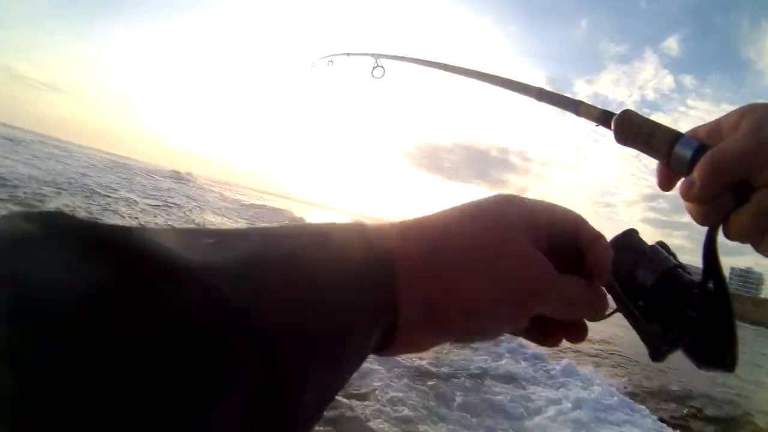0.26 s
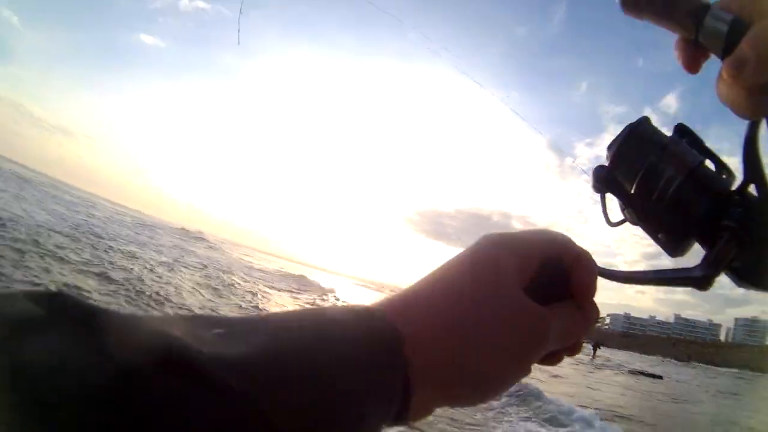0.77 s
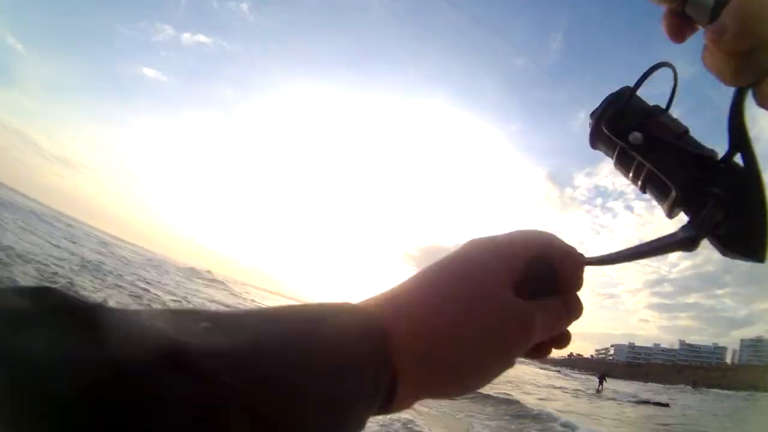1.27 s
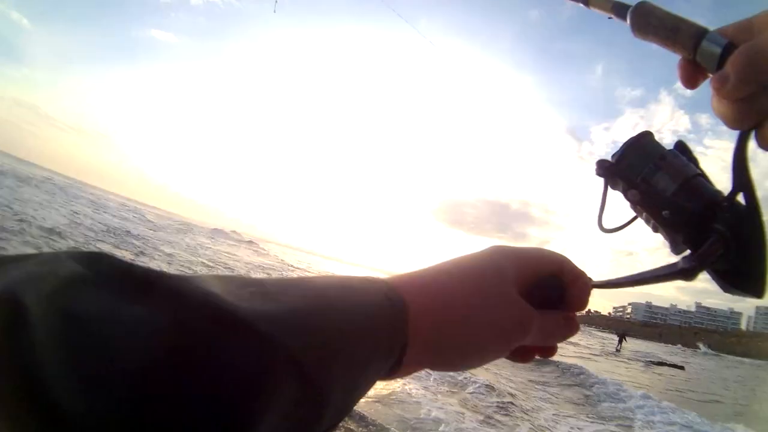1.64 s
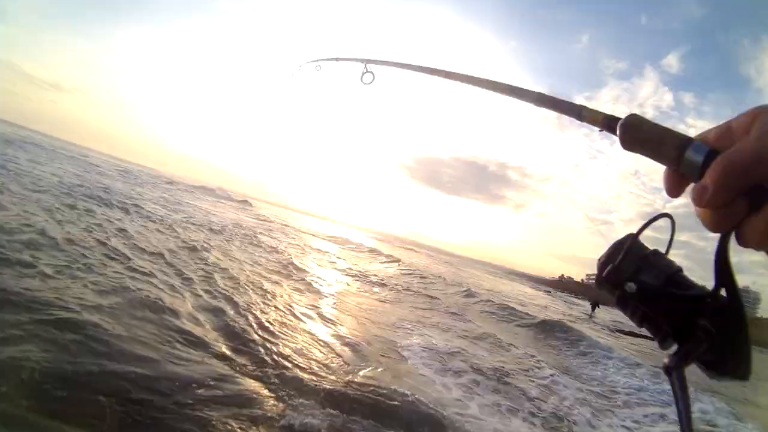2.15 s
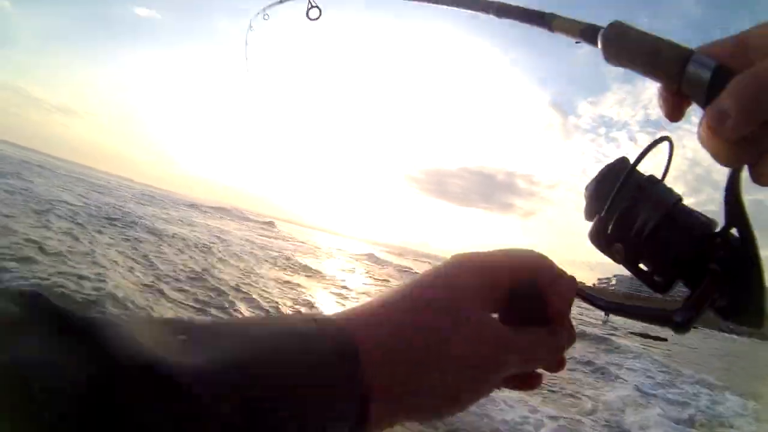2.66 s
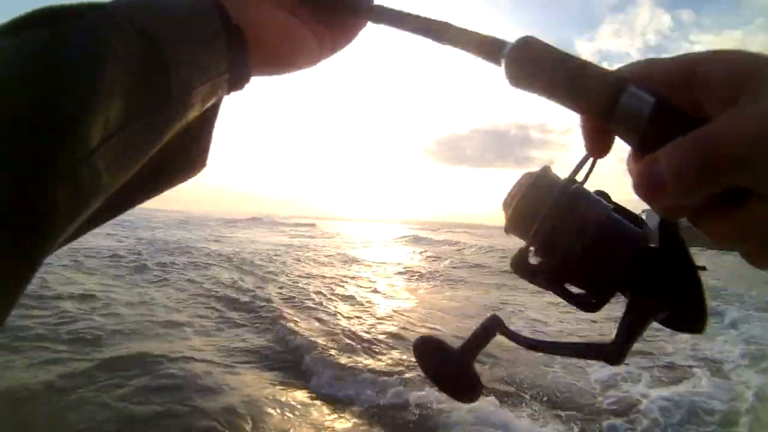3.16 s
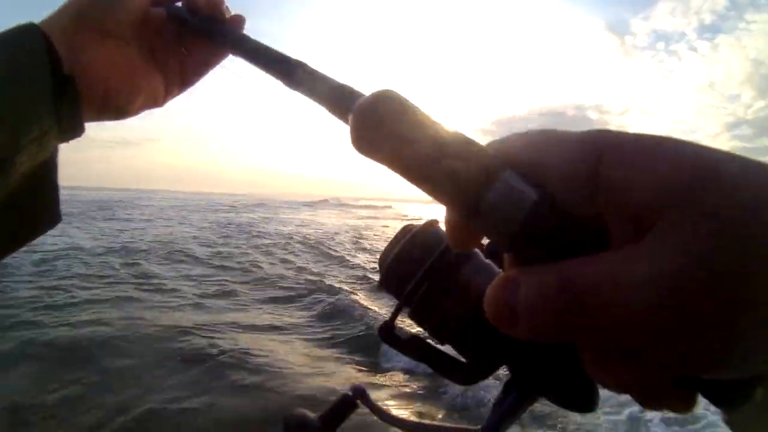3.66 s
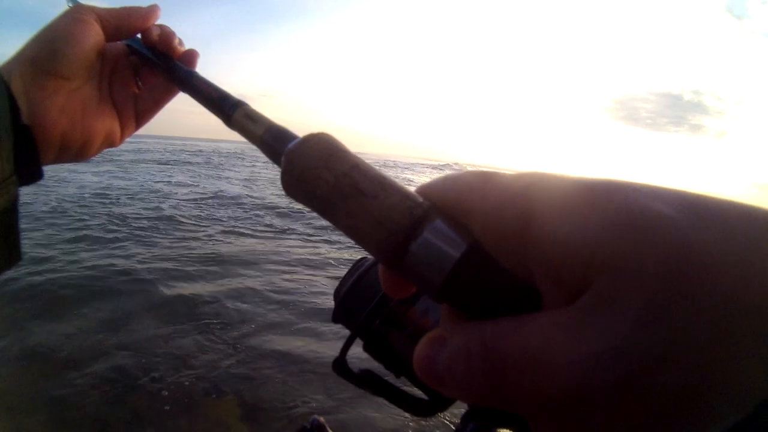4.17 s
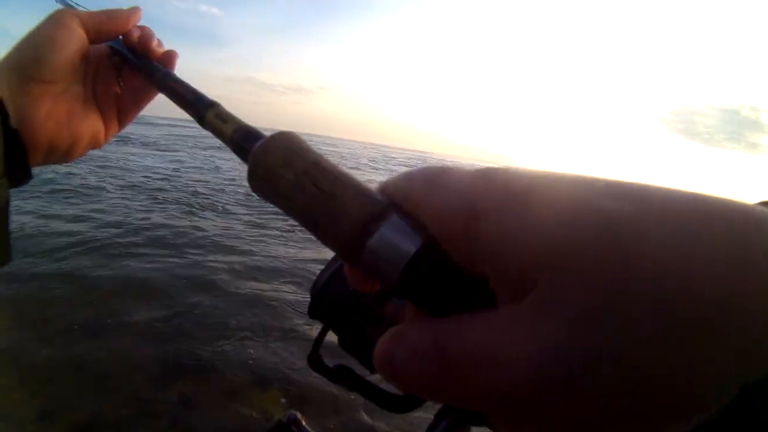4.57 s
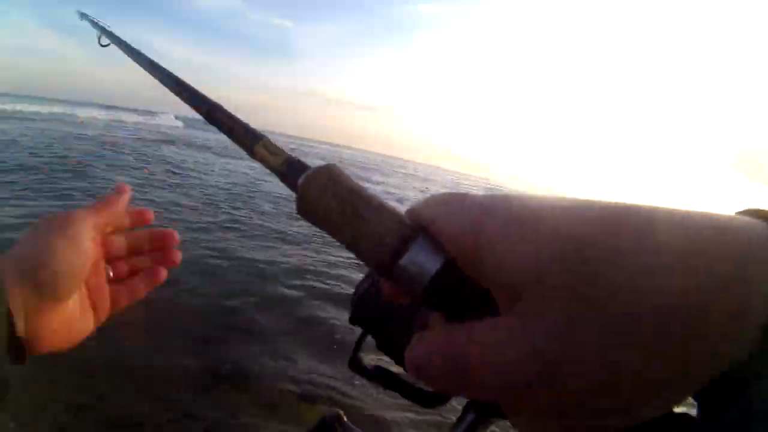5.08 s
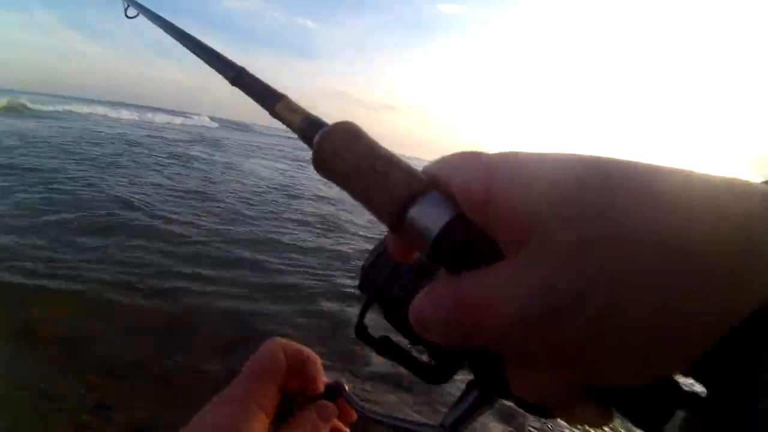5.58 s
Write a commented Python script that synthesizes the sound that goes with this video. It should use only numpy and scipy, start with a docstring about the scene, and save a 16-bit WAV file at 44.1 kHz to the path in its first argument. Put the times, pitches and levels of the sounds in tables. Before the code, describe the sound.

Surf roars and washes over shore rocks for about six seconds, strongest at the start and surging again near 1.4, 3.9 and 4.6 seconds, with fizzing foam. Water slaps and gurgles in nearby hollows, most clearly in the first 0.7 seconds, around 3.4 and at 4.4 seconds. Light wind flutters on the microphone with soft low thumps, easing between about 4 and 5 seconds. An angler's sleeve rustles at the start, from 1.1 to 1.7, from 2.6 to 3.6 and again after 4.9 seconds. A fishing rod and reel tick irregularly throughout, with clearer clicks near 1.7, 3.3 and 4.6 seconds. At 3.5 seconds one short, sharp knock strikes the microphone's case, by far the loudest sound. The body-worn microphone's hard case gives everything a boxy tone, and a faint hiss and thin high whine run underneath.

```python
"""Angler on shore rocks

Surf roars, splashes, foams and slaps into hollows, heard from a body-worn camera in a hard case.
Air buffets the case, a sleeve rustles, rod and reel tick; one sharp knock rings the case.
The case colours water, cloth and ticks. Electronics hiss and whine; the gain ducks at the knock."""
import sys
import numpy as np
from scipy import signal
from scipy.fft import rfft, irfft, next_fast_len
from scipy.io import wavfile
from scipy.ndimage import uniform_filter1d, minimum_filter1d, map_coordinates

SR = 44100
rng = np.random.default_rng(int(sys.argv[2]) if len(sys.argv) > 2 else 0)


def dump_mix(stems):
    """Bounce the given channels to the path in sys.argv[1] as a 16-bit WAV at rate SR."""
    frames = np.atleast_2d(stems).T  # one column per channel
    limited = np.clip(frames, -1, 1)  # hard clip at full scale
    pcm = np.round(limited * 32767).astype(np.int16)
    wavfile.write(sys.argv[1], SR, pcm)


N = 257544

# Resonances and dips of the case wall. Each row: centre in Hz, width in Hz, gain in dB.
CASE_BANDS = [(1000, 356, 8.5), (1053, 49, 3.5), (1293, 158, 7), (1484, 200, 2.5), (1781, 333, 8),
              (2905, 230, 2.5), (3420, 130, -4), (3902, 690, 14), (5140, 250, -4.5), (5750, 2340, 10),
              (7100, 980, 5.5), (7600, 390, -5)]
# Waves running onto the rocks. Each row: crest time in seconds, wash level in dB, foam level in dB.
WAVE_CRESTS = [(.04, -40.5, -51), (.5, -44.5, -55.5), (.75, -48, -69), (1.42, -46, -58.5),
               (2.66, -49.5, -63), (3.02, -50.5, -64), (3.36, -48, -56.5), (3.85, -45, -60),
               (4.35, -50, -58), (4.6, -47.5, -64), (5.6, -47, -76)]
# Water and cloth spectra before the case. Each row: frequency in Hz, relative density in dB.
ROAR_SPECTRUM = [(20, -36), (70, -7.5), (150, -4.5), (300, -1.5), (420, -2), (550, -6), (750, -8),
                 (1100, -16), (2000, -21), (6000, -40.5)]
WASH_SPECTRUM = [(150, -43), (500, -0.5), (800, 0), (1200, -1), (1600, -5.5), (2100, -6.5), (2800, -13),
                 (4500, -36), (12000, -63)]
FOAM_SPECTRUM = [(600, -5), (1600, -8.5), (2400, 9), (3200, -3.5), (4600, -10.5), (6500, -11.5), (9000, -6),
                 (12000, -15), (16000, -34)]
CLOTH_SPECTRUM = [(500, -34), (1100, -4), (1500, -0.5), (1850, 3.5), (2050, 3.5), (2400, -6), (4000, -20),
                  (7000, -26), (12000, -48)]
GURGLE_SPECTRUM = [(300, -36), (700, -3), (1000, 4), (1300, -5), (1900, -31), (3000, -46), (8000, -34)]
# Air, preamplifier and knock contact spectra. Each row: frequency in Hz, relative density in dB.
FLUTTER_SPECTRUM = [(8, -5), (20, 3.5), (35, 1), (60, -11), (100, -10), (200, -14.5), (350, -25.5),
                    (700, -41)]
THUMP_SPECTRUM = [(8, -12), (20, 7), (40, 1), (65, -8), (100, -17.5), (200, -19.5), (600, -57)]
HISS_SPECTRUM = [(100, 0.12), (5000, 0.71), (9000, 2), (10500, 1.1), (12000, -0.62), (13300, -0.88),
                 (15000, 0.55), (16000, -0.53)]
CRACK_SPECTRUM = [(1500, 10), (2500, 12.5), (4000, 2), (6500, -5), (9000, -9), (15000, -16)]
# Soft buffets of air on the case. Each row: peak time in seconds, level in dB.
AIR_BUFFETS = [(.085, -44), (.2, -46), (.45, -44.5), (.835, -42), (1.13, -46), (1.215, -42), (1.39, -46),
               (1.585, -44.5), (1.78, -44.5), (1.97, -43), (2.335, -46), (2.71, -46.5), (2.99, -45.5),
               (3.09, -44.5), (3.47, -47), (3.74, -48), (3.835, -46.5), (4.22, -50), (4.96, -48.5),
               (5.34, -45), (5.7, -43)]
# Sleeve brushing as the arm moves. Each row: start in seconds, length in seconds, level in dB.
SLEEVE_STROKES = [(0, 0.21, -50), (1.122, 0.41, -52), (1.525, 0.18, -48.5), (2.622, 0.11, -49.5),
                  (2.843, .2, -50), (3.08, 0.5, -52), (4.898, 0.62, -56), (5.578, .28, -50)]
# Water slapping near rocks. Each row: peak time in seconds, level in dB, half-length in seconds.
WATER_SLAPS = [(.175, -39.5, 0.15), (.545, -42, 0.036), (.625, -41.5, 0.058), (1.70, -47, 0.069),
               (2.52, -49, 0.083), (2.72, -45, .058), (3.305, -41.5, 0.03), (3.372, -44.5, .025),
               (3.44, -41, 0.022), (3.85, -48, 0.29), (3.97, -44.5, 0.021), (4.378, -39, 0.016),
               (4.51, -43, .044), (5.18, -43.5, 0.026), (5.64, -46, .039)]
# Rod and reel ticks. Each row: start in seconds, peak level in dB, band centre in Hz.
TACKLE_TICKS = [(.276, -42, 1800), (1.15, -41, 3200), (1.448, -40.5, 5000), (1.695, -36, 1400),
                (1.782, -45, 4700), (2.19, -46.5, 3200), (3.153, -41, 2400), (3.31, -37, 1080),
                (3.329, -41, 1600), (4.225, -43, 6400), (4.417, -45, 3900), (4.566, -31, 1200),
                (4.707, -38, 1490), (5.439, -41, 3700), (5.508, -45, 2400), (5.69, -47.5, 4100)]
# Modes of the struck case. Each row: frequency in Hz, relative level in dB, T60 in seconds.
KNOCK_MODES = [(228, 4.5, 0.021), (466, -16, 0.049), (655, -10, 0.033), (1104, 0, 0.02),
               (1224, -2.5, 0.017), (1750, -6.5, 0.016), (2046, -8, 0.0096), (2785, -19, 0.015),
               (3900, -4, 0.0083), (4950, -26, 0.009), (6210, -19, 0.0065), (7280, -27, 0.0091)]


def amp(db):
    """Decibels to gain."""
    return 10 ** (np.asarray(db) / 20)


def unit_rms(x):
    """x at rms 1."""
    return x / np.sqrt(np.mean(x ** 2) + 1e-20)


def spectrum_db(spectrum, hz):
    """Spectrum table interpolated on a log frequency axis."""
    knots_hz, knots_db = np.transpose(spectrum)
    return np.interp(np.log(hz + 1), np.log(knots_hz + 1), knots_db)


def wobble(rate_hz):
    """Smooth random curve, spread about 1."""
    knots = rng.standard_normal(int(N * rate_hz / SR) + 4)
    return map_coordinates(knots, [np.arange(N) * rate_hz / SR])


def coloured(x, gain_db):
    """x through a minimum-phase filter with response gain_db(hz)."""
    size = 2 * next_fast_len(len(x))
    cepstrum = irfft(np.log(amp(gain_db(np.fft.rfftfreq(size, 1 / SR)))), size)
    cepstrum[1:size // 2] *= 2
    cepstrum[size // 2 + 1:] = 0
    return irfft(rfft(x, size) * np.exp(rfft(cepstrum)), size)[:len(x)]


def noise(spectrum):
    """Steady shaped noise, rms 1."""
    return unit_rms(coloured(rng.standard_normal(N), lambda hz: spectrum_db(spectrum, hz)))


def case_db(hz):
    """Summed resonances and dips of the case."""
    return sum(db * .5 ** ((2 * (hz - centre_hz) / width_hz) ** 2)
               for centre_hz, width_hz, db in CASE_BANDS)


def through_case(x, spectrum):
    """x shaped by a source spectrum and the case, rms 1."""
    return unit_rms(coloured(x, lambda hz: spectrum_db(spectrum, hz) + case_db(hz)))


def churn(patchy_db):
    """Noise whose level varies in time-frequency patches, rms 1."""
    bins = signal.stft(rng.standard_normal(N), nperseg=512)[2]
    patches = uniform_filter1d(rng.standard_normal(bins.shape), size=7, axis=0)
    patches = uniform_filter1d(patches, size=10, axis=1)
    return unit_rms(signal.istft(bins * amp(patchy_db * unit_rms(patches)))[1][:N])


def impacts(rate_hz, spread_db):
    """Random impulses of uneven size, rms 1."""
    hits = rng.random(N) < rate_hz / SR
    sizes = amp(spread_db * np.clip(rng.standard_normal(N), -2, 2))
    return unit_rms(hits * sizes * rng.choice([-1, 1], N))


def gate(start_s, end_s, attack_s, release_s):
    """Linear rise from start_s, hold, linear fall from end_s."""
    t = np.arange(N) / SR
    return np.clip((t - start_s) / attack_s, 0, 1) * np.clip(1 - (t - end_s) / release_s, 0, 1)


def swells(rows, x):
    """Short smooth swells of x, each scaled to its own level."""
    out, t = np.zeros(N), np.arange(N) / SR
    for peak_s, db, half_s in rows:
        near = np.abs(t - peak_s) < half_s
        window = np.cos(np.pi / 2 * (t[near] - peak_s) / half_s) ** 4
        burst = window * x[near]
        out[near] += amp(db) * burst * np.linalg.norm(window) / np.linalg.norm(burst)
    return out


def surges_db(crests_s, peaks_db, ebb_db_per_s, build_db_per_s=21.5):
    """Power sum of waves, each building to its crest and ebbing."""
    age_s = np.arange(N) / SR - crests_s[:, None]
    each_db = peaks_db[:, None] + np.minimum(build_db_per_s * age_s, -ebb_db_per_s * age_s)
    return 20 * np.log10(np.linalg.norm(amp(each_db), axis=0))


def surf(roar_mean_db=-50, roar_db_per_wash_db=0.35, fade_db_per_s=0.56):
    """Breakers roar and slowly weaken; water splashes over the rocks and its foam fizzes."""
    crests_s, wash_peaks_db, foam_peaks_db = np.transpose(WAVE_CRESTS)
    wash_db = surges_db(crests_s, wash_peaks_db, ebb_db_per_s=11)
    foam_db = surges_db(crests_s, foam_peaks_db, ebb_db_per_s=13.5)
    roar_db = roar_mean_db + roar_db_per_wash_db * (wash_db - wash_db.mean())
    roar_db -= fade_db_per_s * (np.arange(N) - N / 2) / SR
    slosh = wobble(28)  # single splashes lift wash and foam together
    roar = amp(roar_db + 0.19 * wobble(12)) * through_case(churn(patchy_db=0.44), ROAR_SPECTRUM)
    splashes = churn(patchy_db=1.0) + 0.6 * impacts(rate_hz=900, spread_db=5.5)
    wash = amp(wash_db + 1.4 * slosh) * through_case(splashes, WASH_SPECTRUM)
    fizz = churn(patchy_db=2.5) + .5 * impacts(rate_hz=2000, spread_db=4)
    foam = amp(foam_db + 0.66 * slosh) * through_case(fizz, FOAM_SPECTRUM)
    return roar + wash + foam


def buffeting(flutter_db=-54, rest_drop_db=5, thump_half_s=0.079):
    """Air flutters on the case, less while the arm rests, with occasional soft, deeper thumps."""
    arm_rest = gate(start_s=3.63, end_s=5, attack_s=.2, release_s=0.55)
    flutter = amp(flutter_db - rest_drop_db * arm_rest) * noise(FLUTTER_SPECTRUM)
    thumps = [(peak_s, db, thump_half_s) for peak_s, db in AIR_BUFFETS]
    return flutter + swells(thumps, noise(THUMP_SPECTRUM))


def sleeve():
    """Cloth slides over cloth in many tiny slips with each arm stroke."""
    strokes = sum(amp(db) * gate(start_s, start_s + length_s, attack_s=0.052, release_s=0.088)
                  for start_s, length_s, db in SLEEVE_STROKES)
    slips = churn(patchy_db=2.0) + 0.36 * impacts(rate_hz=740, spread_db=9.5)
    return strokes * amp(2 * wobble(25)) * through_case(slips, CLOTH_SPECTRUM)


def electronics(hiss_db=-64):
    """Preamplifier hiss, a thin whine switching slightly unevenly, and a faint tone above it."""
    whine_hz, switching_hz, upper_hz = 10019.8, 38.2, 14992
    steady_db, switched_db, upper_db = -75, -67, -88.5
    t = np.arange(N) / SR
    switching = np.tanh(5 * np.sin(2 * np.pi * switching_hz * t + .2 * wobble(9)))
    drift_rad = .35 * wobble(7)
    carrier = np.sin(2 * np.pi * whine_hz * t + drift_rad)
    whine = (amp(steady_db) + amp(switched_db) * switching) * carrier
    upper = amp(upper_db) * np.sin(2 * np.pi * upper_hz * t)
    return np.sqrt(2) * (whine + upper) + amp(hiss_db) * noise(HISS_SPECTRUM)


def slaps():
    """Water slaps into rock hollows and sets off a dense gurgle of bubbles."""
    bubbles = impacts(rate_hz=2500, spread_db=4)
    return swells(WATER_SLAPS, through_case(bubbles, GURGLE_SPECTRUM))


def tackle(t60_s=0.0052):
    """Rod and reel tick: short noise bursts, each in its own band, coloured by the case."""
    out, t = np.zeros(N + SR), np.arange(SR // 20) / SR
    for start_s, peak_db, centre_hz in TACKLE_TICKS:
        def response_db(hz):
            octaves = np.log2((hz + 1) / centre_hz)
            return 0.96 * case_db(hz) - np.minimum(22 * octaves ** 2, 50)

        burst = rng.standard_normal(len(t)) * amp(-60 * t / t60_s)
        tick = coloured(burst, response_db)
        out[round(start_s * SR):][:len(t)] += amp(peak_db) * tick / np.abs(tick).max()
    return out[:N]


def knock(start_s=3.5071, gain_db=2.5, contact_s=0.00086, rise_cycles=0.5):
    """Hard blow on the case: a crack, damped modes (low ones build last), a thud as the mount gives."""
    crack_gain_db, crack_t60_s = -17.5, 0.0078
    thud_gain_db, thud_hz, thud_t60_s = -17.5, 58, 0.052
    out, t = np.zeros(N), np.arange(SR // 8) / SR
    ring = np.zeros(len(t))
    for hz, db, t60_s in KNOCK_MODES:
        rise = 1 - np.exp(-t * hz / rise_cycles)
        ring += amp(db - 60 * t / t60_s) * np.sin(2 * np.pi * hz * t) * rise
    burst = rng.standard_normal(len(t)) * amp(-60 * t / crack_t60_s)
    crack = amp(crack_gain_db) * coloured(burst, lambda hz: spectrum_db(CRACK_SPECTRUM, hz))
    thud = amp(thud_gain_db - 60 * t / thud_t60_s) * np.sin(2 * np.pi * thud_hz * t)
    contact = 1 - np.exp(-t / contact_s)
    blow = (thud - ring + crack) * contact  # mount and walls move in opposition
    out[round(start_s * SR):][:len(t)] = amp(gain_db) * blow
    return out


def scene():
    """All sources, mono."""
    return (surf() + buffeting() + sleeve() + electronics() + slaps() + tackle() + knock())[None]


def record(dry):
    """Gain control ducks above half the ceiling and holds; peaks clip; the band is limited."""
    ceiling, duck_db, hold_s, cutoff_hz = .7, -4.2, .168, 15750
    hold_samples = int(hold_s * SR)
    target_gain = np.where(np.abs(dry) > ceiling / 2, amp(duck_db), 1)
    held_gain = minimum_filter1d(target_gain, hold_samples, origin=(hold_samples - 1) // 2)
    clipped = np.clip(dry * uniform_filter1d(held_gain, size=128), -ceiling, ceiling)
    size = next_fast_len(N + SR // 2)
    passband = np.fft.rfftfreq(size, 1 / SR) < cutoff_hz
    return irfft(rfft(clipped, size) * passband, size)[:, :N]


dry = scene()
out = record(dry)
dump_mix(out)
```